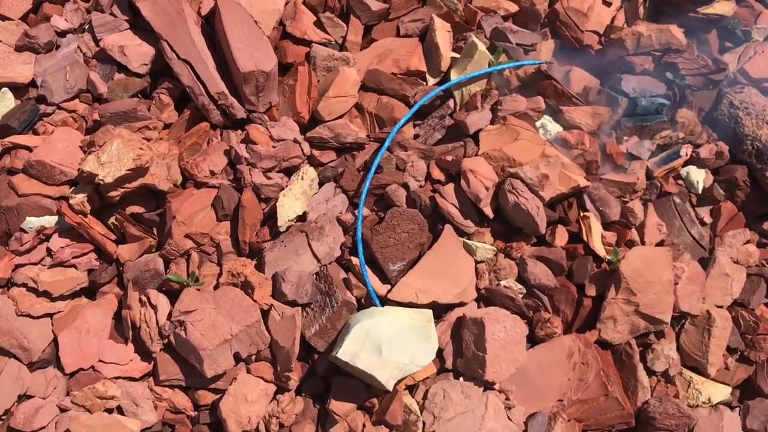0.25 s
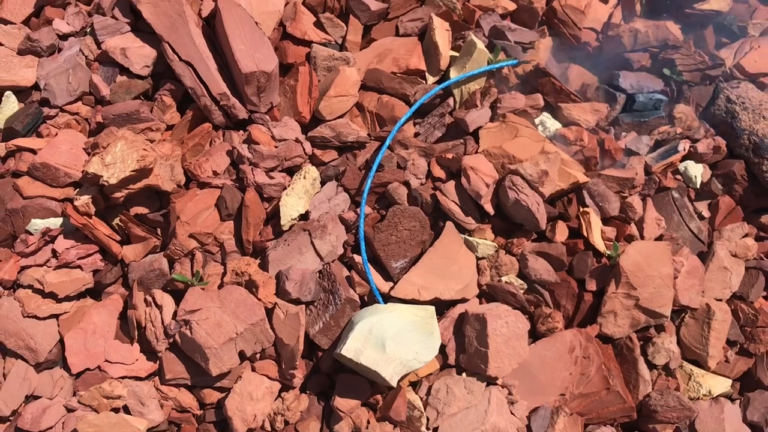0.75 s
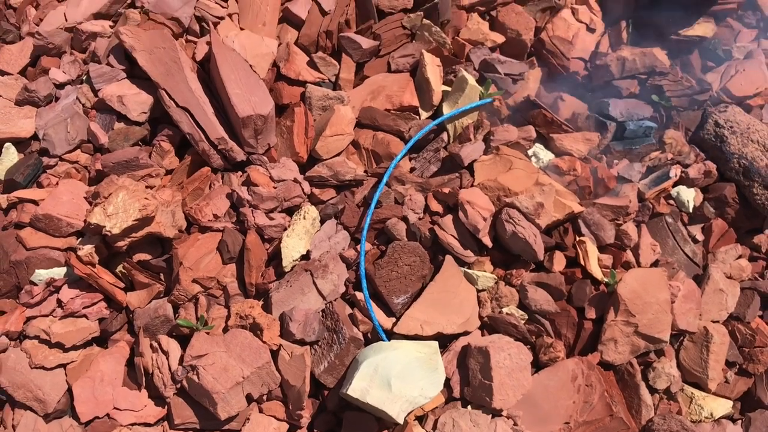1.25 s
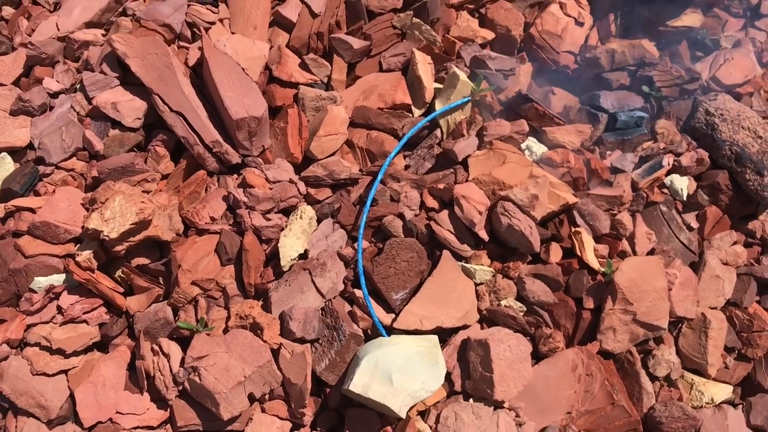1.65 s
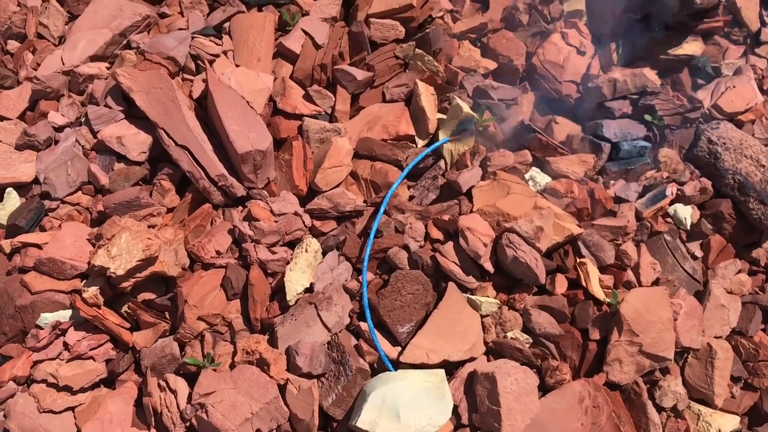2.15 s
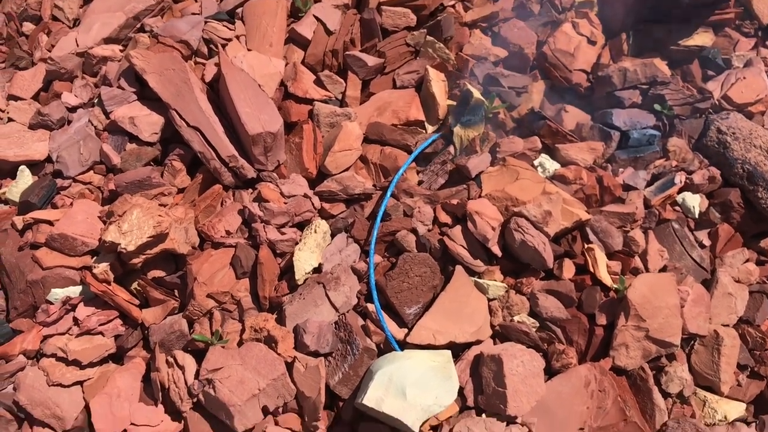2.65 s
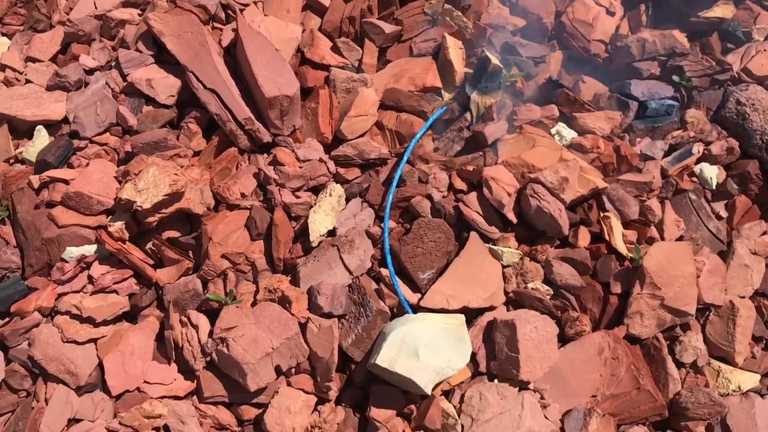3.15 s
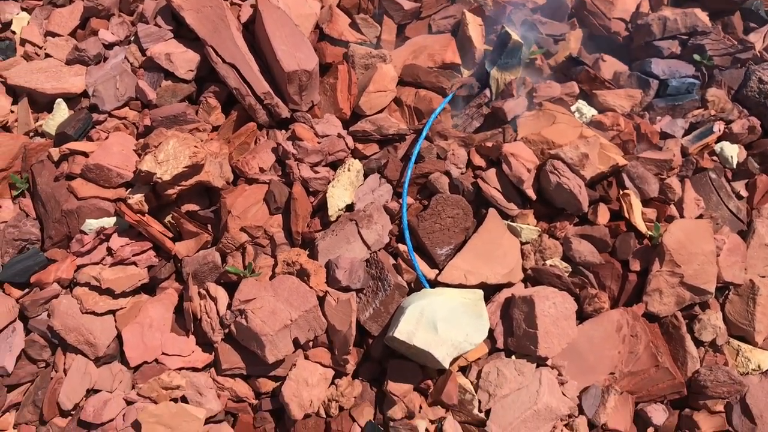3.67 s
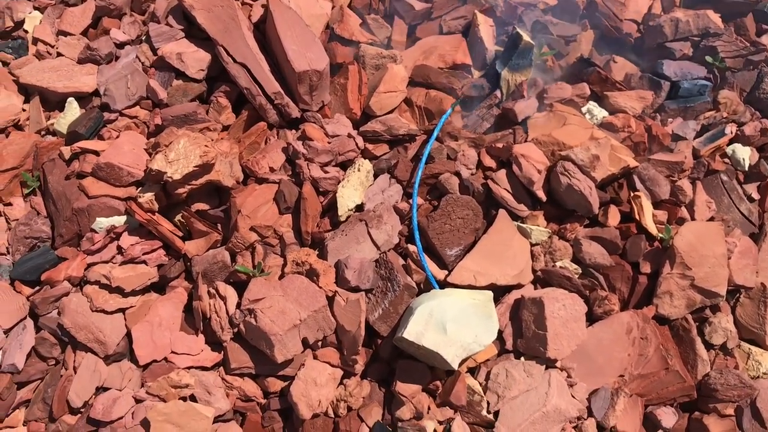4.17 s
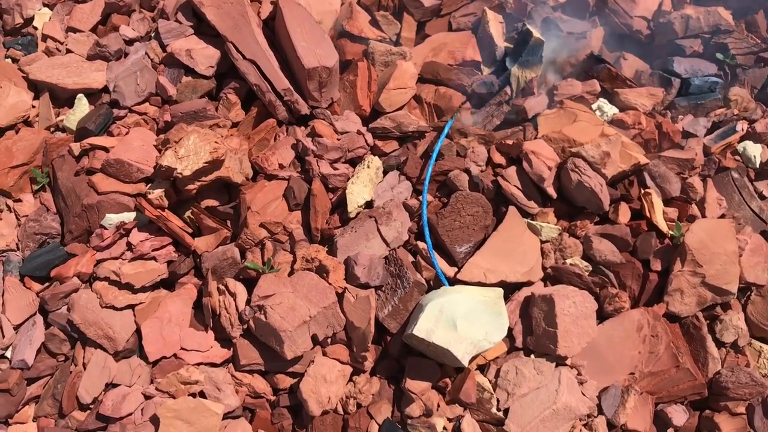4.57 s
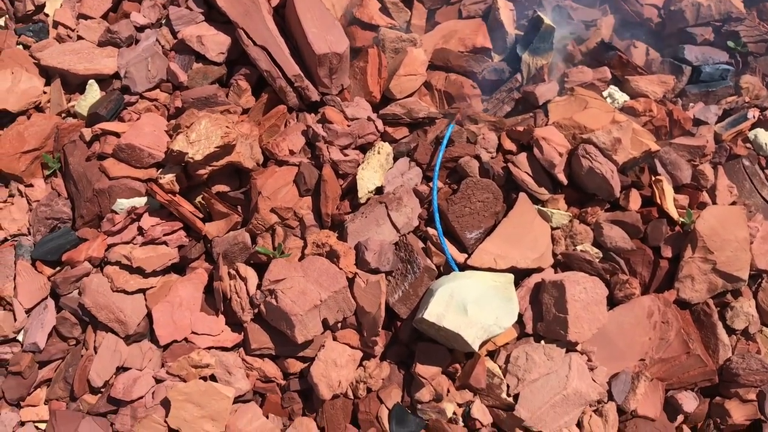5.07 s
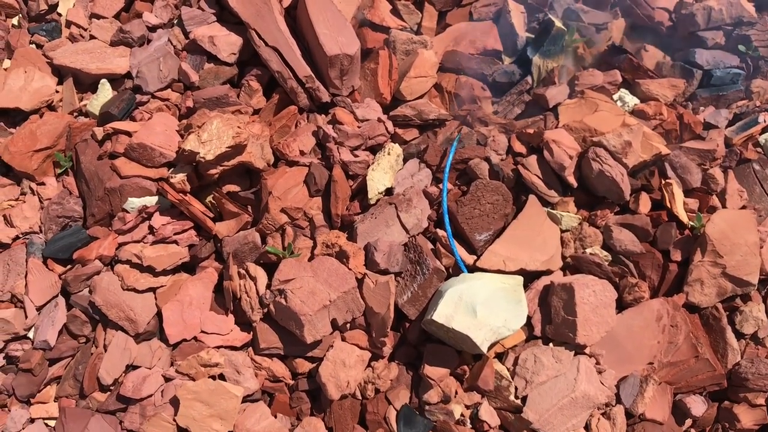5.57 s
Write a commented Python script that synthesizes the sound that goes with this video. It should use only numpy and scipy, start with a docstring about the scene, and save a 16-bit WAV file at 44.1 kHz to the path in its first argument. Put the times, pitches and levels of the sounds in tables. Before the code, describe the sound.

A burning fuse hisses steadily with fine sputtering outdoors, while gusts of wind rumble and thump softly against the nearby microphone.

```python
"""A fuse burns along a bed of loose rock: noise with random surges, sputters and spits makes its jet of gas.
Rings swell and fade in its spectrum as the flame creeps past gaps, and dips come and go as well.
A breeze, made of coloured noise, rumbles and flutters on the nearby microphone in short gusts.
Its strongest eddies land as low thumps, each one a single short pressure pulse."""
import sys
import numpy as np
from scipy import signal
from scipy.fft import rfft, irfft, next_fast_len
from scipy.io import wavfile
from scipy.ndimage import map_coordinates

SR = 44100
rng = np.random.default_rng(int(sys.argv[2]) if len(sys.argv) > 2 else 0)


def file_out(sig):
    """Save sig as 16-bit WAV at sys.argv[1]."""
    # one column per channel
    cols = np.atleast_2d(sig).T
    # limit, then scale
    lim = np.clip(cols, -1, 1)
    pcm = np.round(lim * 32767).astype(np.int16)
    wavfile.write(sys.argv[1], SR, pcm)


N = 256662  # length in samples

# slow strength of the jet in four registers, before flicker and flares:
# t/s, roar level/dB, rush level/dB, hiss level/dB, sizzle level/dB
JET_STRENGTH = [(0.0, -41, -38.5, -40, -40), (0.5, -40, -36, -40.5, -42.5), (0.9, -40.5, -38, -41, -40),
                (1.45, -39.0, -36, -40.5, -38.5), (1.68, -38.0, -36.5, -40.0, -36.0),
                (1.98, -44, -39.5, -37.0, -32), (2.3, -40, -39, -36.5, -36.5), (2.37, -45, -42, -39.0, -40),
                (2.65, -39.5, -36, -40, -38.5), (2.93, -42, -39.5, -42, -41.5),
                (3.04, -39.5, -40, -43.5, -43.0), (3.5, -37.5, -39.5, -40.5, -38.5),
                (3.9, -37.5, -41.5, -41, -39.5), (4.45, -36, -42.5, -39, -44.5),
                (4.78, -37, -40, -41.0, -41.5), (5.13, -35, -40, -41.5, -40.5),
                (5.3, -36, -38.0, -39.5, -42), (5.82, -37, -39.5, -39.0, -43.5)]
# the four registers, from roar to sizzle: lowest f/Hz, highest f/Hz
JET_REGISTERS = [(700, 3000), (3000, 7000), (7000, 11000), (11000, 15800)]
# basic colour of the jet: f/Hz, relative level/dB
JET_COLOUR = [(100, -4), (300, -3), (480, -4), (700, -1.5), (1050, 0.5), (1600, 3), (2500, 1.4), (3200, 0),
              (4450, 1.5), (5000, 0), (7400, -2), (9500, 1.5), (10500, -0.5), (12700, 3), (15800, 1)]
# the powder flares up: middle t/s, length/s, rise/dB
FLARES = [(0.08, 0.027, 3.5), (0.309, 0.076, 3.5), (0.644, 0.056, 1), (0.754, 0.073, 1.7),
          (1.65, 0.16, 1.4), (2.2, 0.15, 1.7), (2.928, 0.13, 4.3), (3.173, 0.033, 1.5), (3.33, 0.064, 2.5),
          (3.514, 0.084, 1.5), (4.122, 0.043, 2), (4.255, 0.072, 3.5), (4.673, 0.034, 2),
          (4.754, 0.121, 3.1), (4.895, 0.049, 2), (5.225, 0.038, 1.5), (5.35, 0.11, 2.5), (5.6, 0.033, 2)]
# the flame passes a gap between stones, which rings:
# middle t/s, length/s of even creeping, f/Hz at the middle, gain/dB
RINGING_GAPS = [(1.45, 1.5, 380, 2.5), (0.51, 2.6, 740, 3.5), (1.8, .8, 1800, 2.5), (4.1, 4.2, 2540, 3),
                (1.72, 1.2, 3730, 5.5), (3.34, 2, 4000, 4), (2, 1.3, 5800, 5), (1.1, 0.89, 8600, 7),
                (1.84, 1, 8350, 4.5), (2.62, 1.2, 8560, 3.5), (4.63, 1.3, 6940, 7), (0.5, 1.7, 9960, 4),
                (.1, 1, 11400, 2.5), (5.56, 1.1, 9600, 6.5), (3.7, 1, 13400, 7)]
# dips in the jet's spectrum, which come and go and sink:
# middle t/s, length/s of even creeping, f/Hz at the middle, gain/dB, width/Hz
JET_DIPS = [(.7, 0.65, 12800, -5.5, 600), (.72, 0.79, 14500, -9, 320), (.25, 0.87, 9050, -5, 220),
            (.3, 1.1, 10350, -7.5, 254), (1.2, 0.9, 10600, -6, 330), (1, 1.2, 5630, -4.5, 220),
            (2.25, 0.45, 15400, -15, 350), (2.44, 0.31, 766, -1, 330), (2.4, 1.6, 5150, -3.5, 220),
            (2.55, 0.79, 14900, -17, 400), (2.6, 0.92, 13500, -14, 320), (2.62, 0.74, 10000, -10, 300),
            (2.62, .95, 8050, -6.5, 170), (3.4, 1.9, 6700, -8, 190), (3.55, 2, 11400, -6, 420),
            (3.6, 1.1, 5470, -10, 259), (4.3, 0.96, 5040, -10, 280), (4, .6, 14600, -10, 320),
            (4.5, 1.1, 10200, -7.5, 360), (5.1, 2.3, 5790, -7, 170), (5.15, 0.36, 8150, -8, 220),
            (5.7, .7, 13200, -6, 650), (5.8, 0.58, 10800, -8, 350), (5.8, 0.45, 6100, -5, 300)]
# the burnt end gives way and the flame jumps to a new place: t/s, creeping time skipped/s
FLAME_JUMPS = [(2.34, .5), (2.96, 0.45), (4.1, 0.1)]
# slowly rising and falling breeze beneath the gusts, before waver and trims:
# t/s, rumble level/dB, flutter level/dB
BREEZE_BASE = [(0, -52.5, -49.5), (1.15, -49, -48), (1.55, -41, -50), (2.15, -36, -44.5), (2.6, -35.5, -41),
               (3.15, -34, -39), (3.38, -33.5, -47), (3.95, -34, -37), (4.25, -38.5, -49), (4.6, -41, -49),
               (5.4, -42, -57), (5.82, -45.5, -54)]
# gusts on top of it, before trims: middle t/s, length/s, rumble level/dB, flutter level/dB
GUSTS = [(1.375, 0.058, -35.5, -35.5), (1.5, 0.036, -37, -50), (1.643, 0.025, -28, -24.5),
         (1.7, 0.062, -29.5, -50), (1.887, 0.061, -27, -31), (1.948, 0.046, -23, -23.5),
         (2.017, 0.028, -24, -27), (2.063, 0.013, -22, -26), (2.126, 0.02, -29, -42),
         (2.441, 0.1, -30, -34), (2.758, 0.064, -32, -21), (2.908, 0.072, -40, -26),
         (3.069, 0.05, -32, -15), (3.142, 0.046, -25, -23), (3.205, 0.035, -25.5, -24),
         (3.282, 0.038, -20.5, -22.5), (3.493, 0.049, -25, -24), (3.728, 0.042, -21.5, -19),
         (3.81, 0.033, -25, -33), (3.934, 0.034, -27, -44), (4.022, 0.095, -26, -32),
         (4.114, 0.034, -26, -31.5), (4.448, 0.084, -34, -33), (4.736, 0.068, -30.5, -41.5),
         (4.83, 0.027, -34, -43), (5.058, 0.062, -27.5, -49), (5.241, 0.018, -27.5, -49),
         (5.36, 0.063, -31, -50), (5.56, .04, -39, -54), (5.71, .04, -36, -51)]
# colour of the slow rumble: f/Hz, relative level/dB
RUMBLE_COLOUR = [(20, -26), (35, -18), (50, 4.5), (68, 3), (100, -1), (135, -7), (200, -48), (400, -44)]
# colour of the faster flutter: f/Hz, relative level/dB
FLUTTER_COLOUR = [(50, -42), (90, -9.5), (130, 1), (190, -1), (260, -10), (370, -24), (500, -39),
                  (1000, -47.5)]
# colour of the finest, tearing turbulence: f/Hz, relative level/dB
TEARING_COLOUR = [(100, -26), (200, -2), (280, 1), (370, -0.5), (480, -13.5), (750, -19), (1500, -56)]
# eddies striking the microphone: t/s, peak level/dB before the trim, centre f/Hz
EDDIES = [(1.64, -16, 95), (1.937, -22, 330), (1.94, -11, 128), (2.302, -19, 69.5), (2.752, -11, 94),
          (2.791, -12.5, 94), (3.062, -10, 287), (3.094, -10.5, 251), (3.513, -16, 102), (3.731, -14, 95),
          (3.738, -17.5, 325), (3.927, -19, 85), (4.023, -16, 100), (4.445, -20.5, 122), (4.823, -20, 69),
          (5.047, -23.5, 55)]

FLICKER_DB, FLICKER_RATE = 0.56, 14  # each register's unsteadiness: depth in dB, random points a second
GAP_WIDTH_HZ, GAP_WIDENING = 330, 0.013  # base width of a ring; added width as a share of its frequency
# rings and dips sink in frequency: speed at 10 kHz, power of frequency by which it grows
SINK_HZ_PER_S, SINK_GROWS = 390, 2.4
PASS_EDGE, FLARE_EDGE, GUST_EDGE = 2.8, 2.3, 1.92  # steepness with which each comes and goes
JUMP_S = 0.017  # sets how long a jump takes: half the width of its main rise
TOP_HZ = 15750  # nothing is kept from here up


def amp(db):
    """Turn decibels into gain."""
    return 10 ** (np.asarray(db) / 20)


def unit(x):
    """Scale x to an rms (average strength) of 1."""
    return x / np.sqrt(np.mean(x ** 2) + 1e-20)


def along(points, hz):
    """Read a curve of (Hz, value) points on a log frequency axis."""
    f, value = np.transpose(points)
    return np.interp(np.log(hz + 1), np.log(f + 1), value)


def curves(rows, t):
    """Read each column after the time at the times t."""
    seconds, *columns = np.transpose(rows)
    return [np.interp(t, seconds, column) for column in columns]


def wobble(rate):
    """Draw a smooth random curve through `rate` random points a second."""
    points = rng.standard_normal(int(N * rate / SR) + 4)
    return map_coordinates(points, [np.arange(N) * rate / SR])


def filtered(x, response):
    """Multiply the spectrum of x by a response that depends on frequency."""
    m = next_fast_len(N + SR // 2)  # padded so that the end does not wrap onto the start
    hz = np.fft.rfftfreq(m, 1 / SR)
    return irfft(rfft(x, m) * response(hz), m)[:N]


def swell(t, middle, length, edge):
    """Rise and fall between 0 and 1; a higher edge gives a flatter top."""
    return np.exp(-np.abs(2 * (t - middle) / length) ** edge)


def powder(surge_db, sputter_db, spit_rate, spit_db):
    """Raw jet noise: the gas flow surges and sputters, and single grains of powder spit."""
    gas = rng.standard_normal(N)
    spits = rng.random(N) < spit_rate / SR  # spit_rate is the average number a second
    grains = spits * rng.standard_normal(N)
    flow = amp(surge_db * wobble(28) + sputter_db * wobble(170))
    return unit(gas * flow + amp(spit_db) * grains)


def scatter(hz, t, ripple_db, shortest, longest, drift, count):
    """Many faint echoes off the rubble ripple the spectrum; each comes and goes as the flame moves."""
    delay = rng.uniform(shortest, longest, count)  # seconds
    knots = rng.standard_normal((count, int(t[-1] * drift) + 4))
    strength = np.array([map_coordinates(k, [t * drift]) for k in knots])
    return ripple_db * unit(np.cos(2 * np.pi * np.outer(hz, delay)) @ strength)


def place(t):
    """How far the flame has come, in seconds of even creeping, with its jumps added."""
    return t + sum(skip * (1 + np.tanh((t - s) / JUMP_S)) / 2 for s, skip in FLAME_JUMPS)


def ridges(passes, hz, t):
    """Bell-shaped peaks or dips in dB; each swells, sinks in frequency and fades as the flame goes by."""
    total = 0
    for s, length, centre_hz, db, width in passes:
        sink = SINK_HZ_PER_S * (centre_hz / 10 ** 4) ** SINK_GROWS  # Hz per second
        offset = hz[:, None] - centre_hz + sink * (t - s)
        bell = np.exp(-.5 * (offset / width) ** 2)
        total = total + db * swell(place(t), place(s), length, PASS_EDGE) * bell
    return total


def fuse():
    """The flaring gas jet hisses; rings, dips and faint echoes colour it as the flame creeps on."""
    jet = powder(surge_db=0.4, sputter_db=0.77, spit_rate=250, spit_db=2.5)
    hz, t, spectrum = signal.stft(jet, SR, nperseg=1024)
    rubble_db = scatter(hz, t, ripple_db=1.15, shortest=.0012, longest=.008, drift=1.6, count=40)
    rings = [(s, length, f, db, GAP_WIDTH_HZ + GAP_WIDENING * f) for s, length, f, db in RINGING_GAPS]
    colour_db = along(JET_COLOUR, hz)[:, None] + ridges(rings, hz, t)
    colour = amp(colour_db + ridges(JET_DIPS, hz, t) + rubble_db)
    # a flare lifts the whole jet
    level_db = sum(db * swell(t, s, length, FLARE_EDGE) for s, length, db in FLARES)
    # each register also drifts and flickers by itself and blends into its neighbours
    centres = np.mean(JET_REGISTERS, axis=1)
    strengths = curves(JET_STRENGTH, t)
    for (lo, hi), db, own in zip(JET_REGISTERS, strengths, np.eye(len(centres))):
        power = np.sum(colour[(hz >= lo) & (hz < hi)] ** 2, axis=0) / len(hz)
        flicker = FLICKER_DB * np.interp(t, np.arange(N) / SR, wobble(FLICKER_RATE))
        share = np.interp(hz, centres, own)
        # taking off the colour's own power leaves the register near its set strength
        level_db = level_db + np.outer(share, db + flicker - 10 * np.log10(power))
    return signal.istft(spectrum * colour * amp(level_db), SR, nperseg=1024)[1][:N]


def airflow(waver_db):
    """Rumble and flutter levels in dB: gusts add their power to a wavering breeze."""
    t = np.arange(N) / SR
    power = amp(np.array(curves(BREEZE_BASE, t)) + waver_db * wobble(13)) ** 2
    for s, length, *levels in GUSTS:
        power = power + np.outer(amp(levels) ** 2, swell(t, s, length, GUST_EDGE))
    return 10 * np.log10(power)


def turbulence(colour, hold):
    """Coloured noise, like many mixed eddies, whose power stays near 1 over any `hold` seconds."""
    x = unit(filtered(rng.standard_normal(N), lambda hz: amp(along(colour, hz))))
    power = signal.fftconvolve(x ** 2, np.hanning(int(hold * SR) + 3), "same")
    return unit(x / np.sqrt(np.abs(power) + 1e-9))


def breeze(rumble_db, flutter_db, lull_db, tear_db, tear_growth):
    """Slow air rumbles on the microphone; faster gusts flutter, the fastest tear into finer, higher noise."""
    rumble, flutter = airflow(waver_db=2.5)
    low = amp(rumble + rumble_db) * turbulence(RUMBLE_COLOUR, hold=0.12)
    turbulent = 1 / (1 + amp(lull_db - flutter) ** 2)  # in a lull the flow turns smooth
    middle = turbulent * amp(flutter + flutter_db) * turbulence(FLUTTER_COLOUR, hold=0.14)
    # tearing reaches tear_db in the strongest flutter and falls away faster than the flutter does
    tear_level = tear_db + tear_growth * (flutter - flutter.max())
    high = amp(tear_level) * turbulence(TEARING_COLOUR, hold=0.12)
    return low + middle + high


def thumps(air, eddy_db, calm):
    """Each eddy is a brief suction between two rims of raised pressure; its core calms the other air noise."""
    t = np.arange(N) / SR
    for s, db, hz in EDDIES:
        u = np.minimum((np.pi * hz * (t - s)) ** 2, 50)  # squared distance from the core, capped
        calmed = air * (1 - np.clip(calm, 0, 1) * np.exp(-u / 2))
        pulse = (2 * u - 1) * np.exp(-u)
        air = calmed + amp(db + eddy_db) * pulse
    return air


def scene():
    """Add fuse and wind, alike in both channels."""
    air = breeze(rumble_db=-1.5, flutter_db=-3.5, lull_db=-49.0, tear_db=-22.5, tear_growth=1.91)
    mono = fuse() + thumps(air, eddy_db=-0.5, calm=0.55)
    return np.array([mono, mono])


def record(dry):
    """The recorder thins the deepest bass and keeps nothing above its band limit."""
    low_cut_hz = 33

    def passband(hz):
        """A smooth bass cut and a sharp upper limit."""
        return (hz < TOP_HZ) * hz ** 3 / np.sqrt(hz ** 6 + low_cut_hz ** 6)

    return np.array([filtered(x, passband) for x in dry])


dry = scene()
out = record(dry)
file_out(out)
```